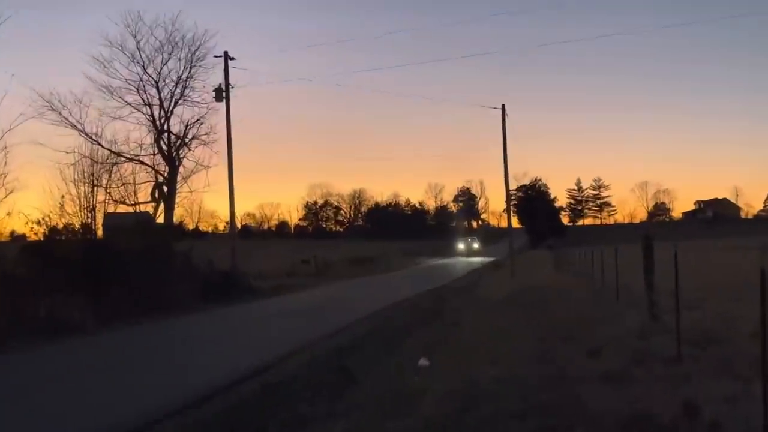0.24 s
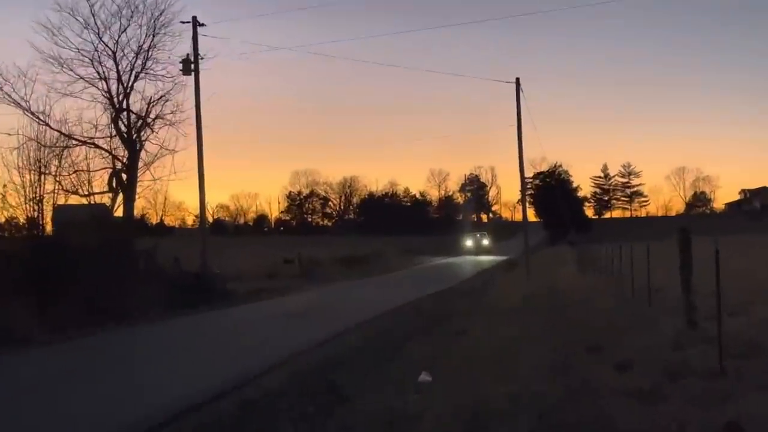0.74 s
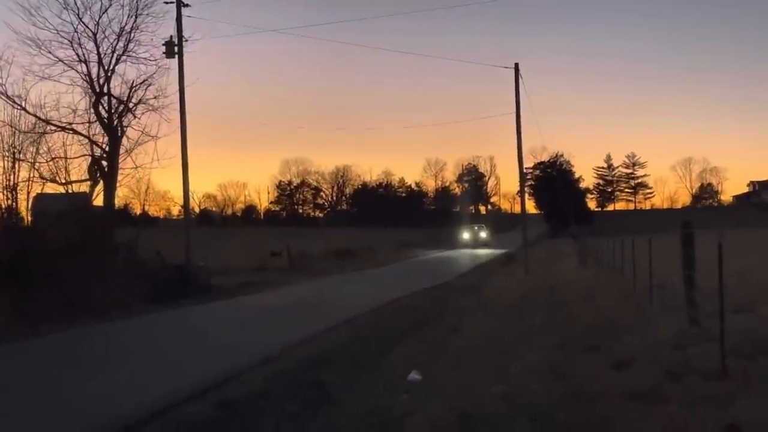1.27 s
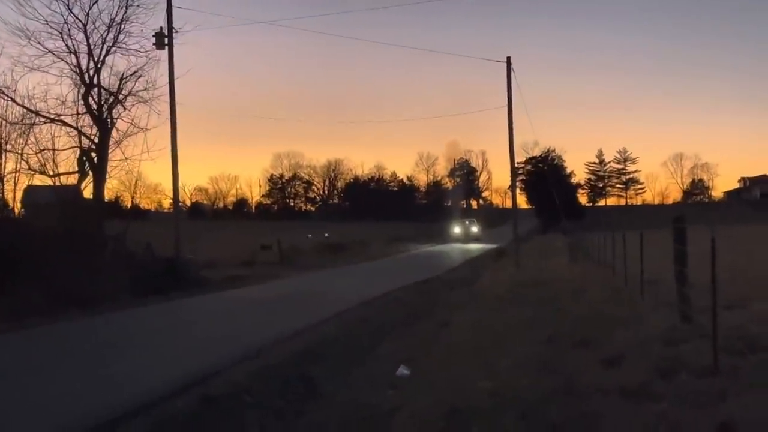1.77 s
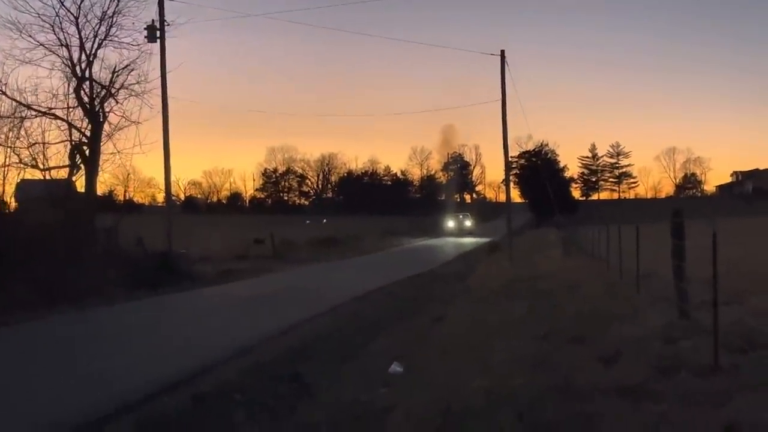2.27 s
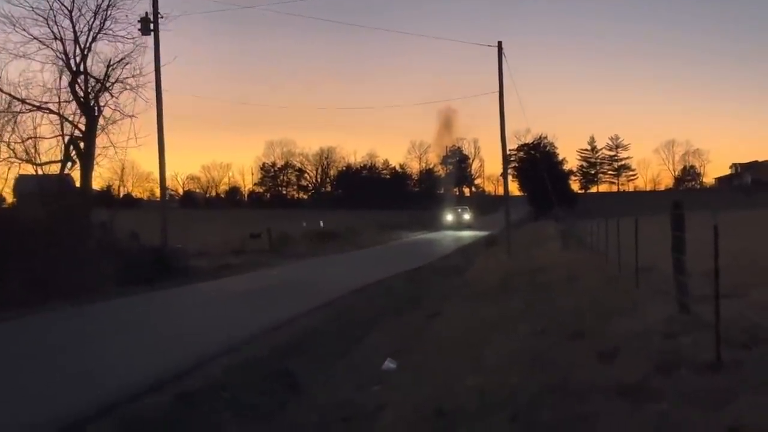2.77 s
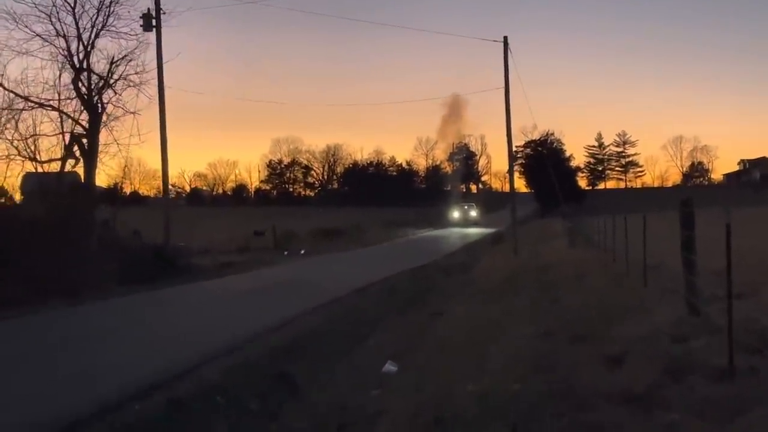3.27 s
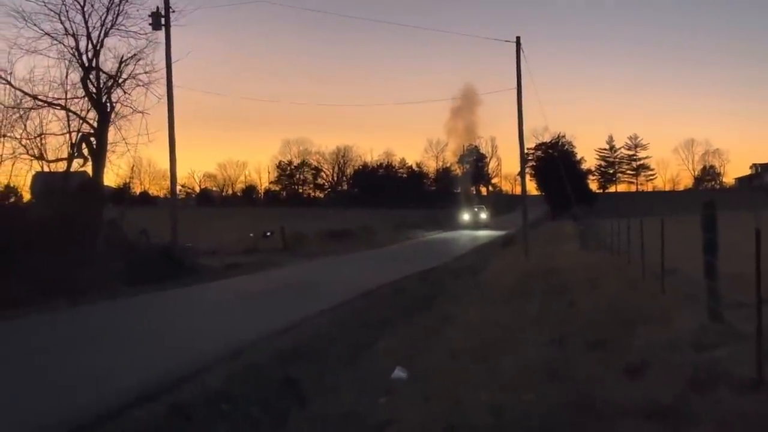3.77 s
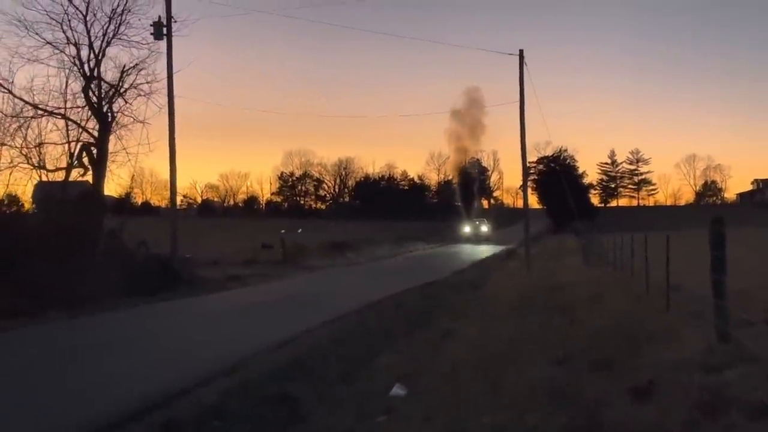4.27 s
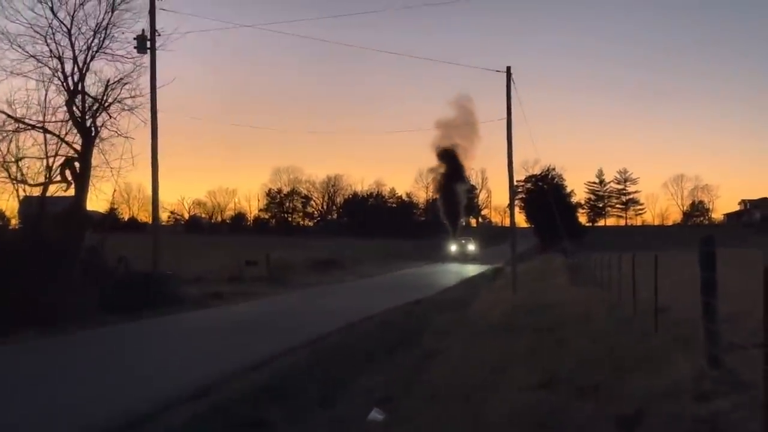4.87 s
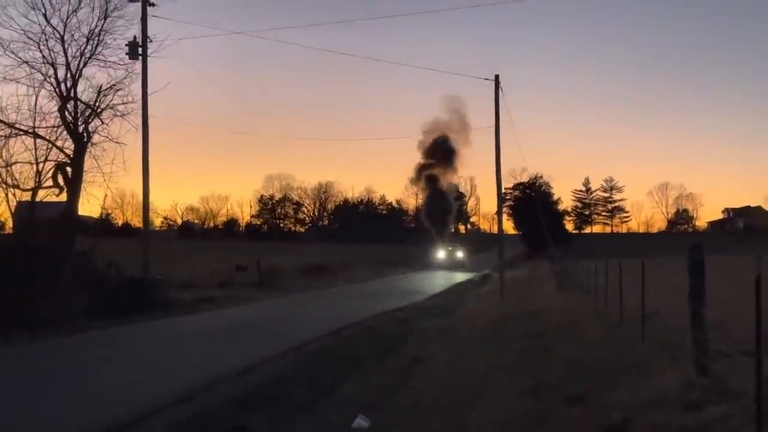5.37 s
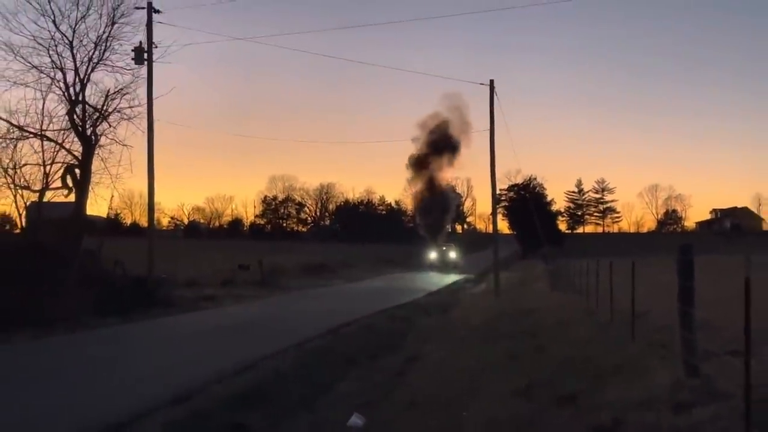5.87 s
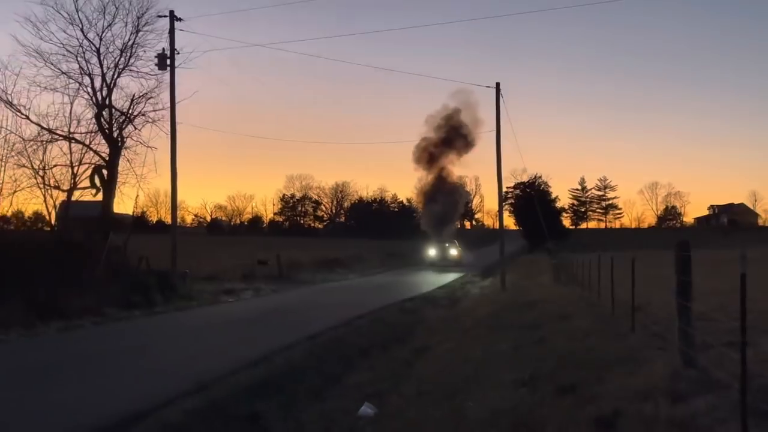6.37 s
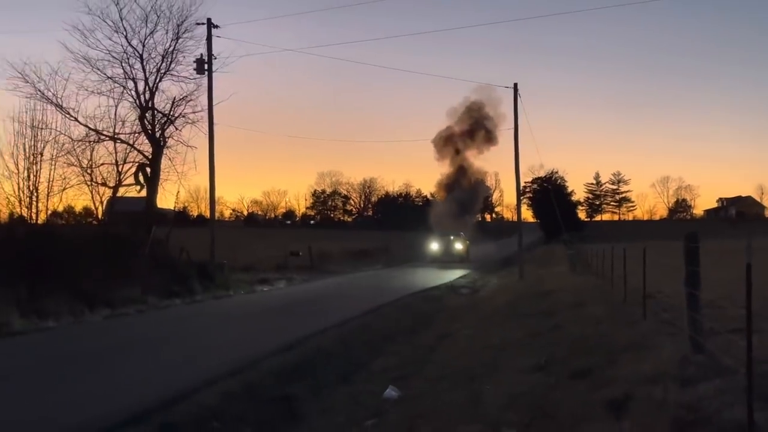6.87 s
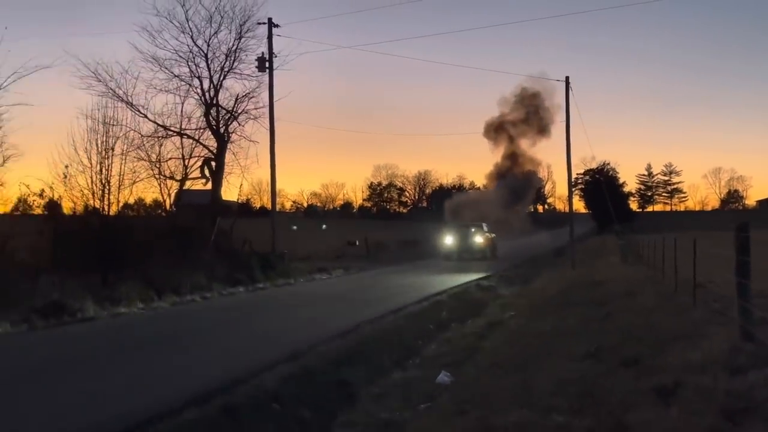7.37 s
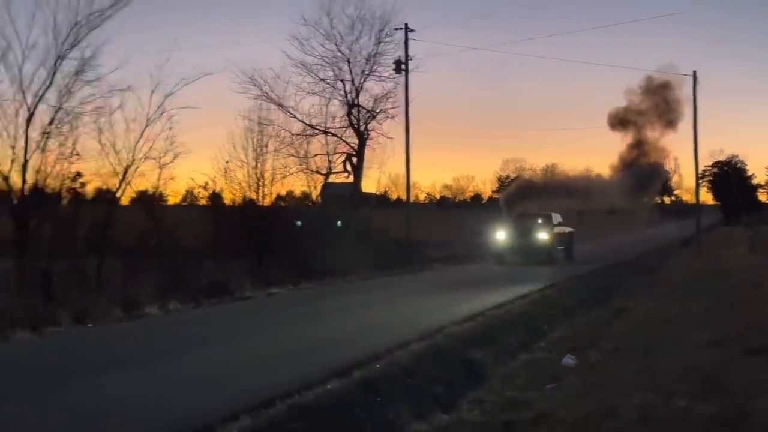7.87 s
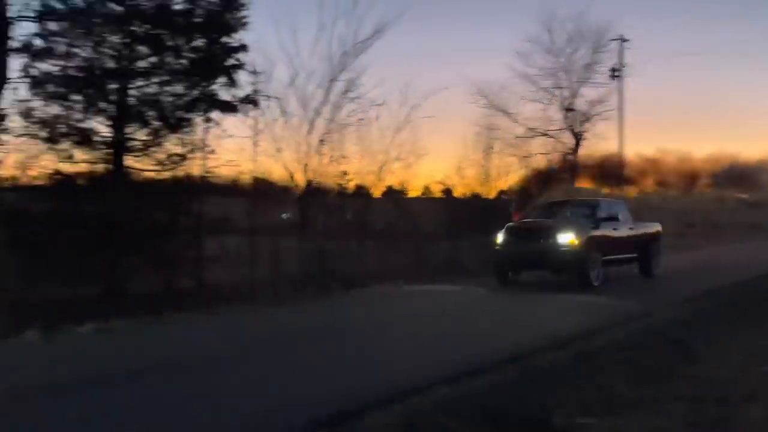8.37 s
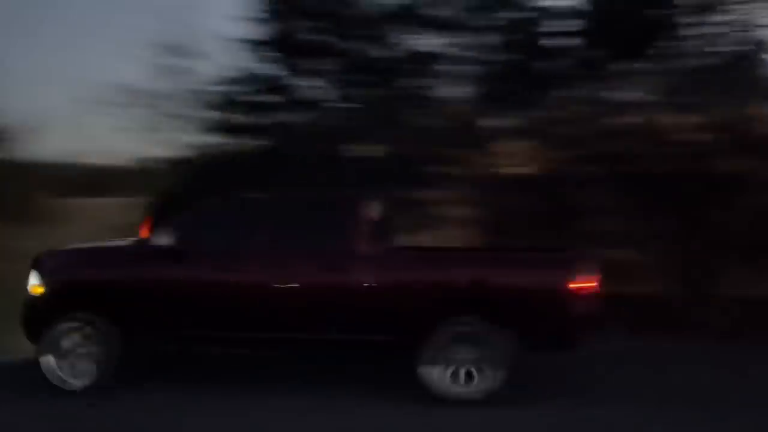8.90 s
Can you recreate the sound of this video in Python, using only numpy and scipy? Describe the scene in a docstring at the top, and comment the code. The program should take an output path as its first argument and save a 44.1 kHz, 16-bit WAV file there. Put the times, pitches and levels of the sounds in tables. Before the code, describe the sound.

On an open rural road, a six-cylinder diesel pickup accelerates towards a handheld stereo microphone at the verge. A booming, barking exhaust note climbs steadily, joined by a thin rising turbo whistle and rougher rasp. After six seconds the pitch drops sharply at a gear change, then climbs again, brighter and hissier. The truck sweeps past with a short tyre and air rush, its note falling away.

```python
"""A six-cylinder diesel pickup pulls hard towards a roadside listener, over a low rumble.
First the exhaust note climbs: each firing gives a boom, a ringing bark and a burst of rasping gas.
From about three seconds a thin turbo whistle rises for a while; the bark grows rougher.
After six seconds the note drops at a gear change and climbs again, with a road echo as the truck nears.
Near the end tyres and air sweep past, and the note falls away as the truck passes."""
import sys
import numpy as np
from scipy import signal
from scipy.fft import rfft, irfft, next_fast_len
from scipy.io import wavfile
from scipy.ndimage import uniform_filter1d, map_coordinates

SR = 44100
rng = np.random.default_rng(int(sys.argv[2]) if len(sys.argv) > 2 else 0)


def voltage_ratio(level):
    """Linear amplitude factor for a level in decibels (scalar or array-like)."""
    return 10 ** (np.asarray(level, float) / 20)


def int16_out(signal):
    """Quantize to a 16-bit WAV file."""
    q = np.round(np.clip(np.atleast_2d(signal).T, -1, 1) * 32767)
    wavfile.write(sys.argv[1], SR, q.astype(np.int16))


N = 403074


def rms_one(x, window_s=0.16):
    """Even out the slow level, so that the sound stays near rms 1."""
    return x / np.sqrt(uniform_filter1d(x ** 2, size=int(window_s * SR), mode="reflect") + 1e-14)


def in_time(rows):
    """Turn the columns of a table into curves, one value a sample."""
    s, *columns = np.transpose(rows)
    return [np.interp(np.arange(N) / SR, s, column) for column in columns]


def cut(x, hz, kind, order=4):
    """Butterworth filter: keeps the low, high or band part of a sound."""
    return signal.sosfilt(signal.butter(order, hz, kind, fs=SR, output="sos"), x)


def resonate(x, modes):
    """Let side-by-side resonances ring, with alternating signs."""
    out = 0
    for k, (hz, width, db) in enumerate(modes):
        r = np.exp(-np.pi * width / SR)
        feedback = [1, -2 * r * np.cos(2 * np.pi * hz / SR), r * r]
        ring = signal.lfilter([(1 - r * r) / 2, 0, (r * r - 1) / 2], feedback, x)
        out = out + (-1) ** k * voltage_ratio(db) * ring
    return out


def coloured(x, table, gain):
    """Filter whose response at each frequency is gain(table value)."""
    hz, value = np.transpose(table)
    size = next_fast_len(N + 2048)
    grid = np.arange(size // 2 + 1) * SR / size
    response = gain(np.interp(np.log(grid + 1), np.log(hz + 1), value))
    return irfft(rfft(x, size) * response, size)[:N]


def drift(rate):
    """Random wander of spread 1; a higher rate [Hz] wanders faster."""
    knots = rng.standard_normal(int(N / SR * 60) + 2)   # 60 a second
    r = np.exp(-2 * np.pi * rate / 60)
    slow = signal.lfilter([1], [1, -r], knots)
    return np.interp(np.arange(N) * 60 / SR, np.arange(len(slow)), slow / slow.std())


# low rumble under the note: (time [s], level [dB])
RUMBLE_LEVEL = [(0.0, -29.5), (2.11, -67), (3.36, -35.5), (6.46, -45), (6.64, -63), (7.41, -47),
                (8.88, -35), (9.14, -64)]


def rumble():
    """Two separate low noises, whose shared level rises and falls."""
    noises = [rms_one(cut(rng.standard_normal(N), [62, 100], "band", order=3), window_s=1.0)
              for _ in range(2)]
    return voltage_ratio(in_time(RUMBLE_LEVEL)[0]) * noises


# tyres and air sweeping past: (time [s], level [dB])
WHOOSH_LEVEL = [(8.45, -102), (8.68, -46), (8.85, -21), (8.93, -34.5), (9.14, -53)]
# resonances of that noise: (frequency [Hz], width [Hz], level [dB])
TYRE_MODES = [(4700, 2000, -3), (5900, 1100, -2.5)]


def whoosh():
    """Smooth noise spread along the passing body, so it differs between the sides."""
    middle, side = [rms_one(cut(resonate(rng.standard_normal(N), TYRE_MODES), 3200, "high"))
                    for _ in range(2)]
    return voltage_ratio(in_time(WHOOSH_LEVEL)[0]) * (middle + 0.55 * side * [[1], [-1]])


# sharp ticks in the treble: (time [s], burst level before ringing [dB])
TICK_TIMES = [(1.612, -27), (1.63, -24), (1.938, -15), (1.948, -23), (1.988, -18), (2.065, -26),
              (3.68, -20)]
# resonances of a tick: (frequency [Hz], width [Hz], level [dB])
TICK_MODES = [(6300, 1500, -10), (8340, 2500, 7.5), (11300, 2100, 0)]


def ticks():
    """Bursts of bright noise that start at once and die away within milliseconds."""
    decay_s = 0.0016
    t = np.arange(N) / SR
    shape = sum(voltage_ratio(db) * (t > s) * np.exp(-np.maximum(t - s, 0) / decay_s) for s, db in TICK_TIMES)
    return cut(resonate(shape * rng.standard_normal(N) + 1e-18, TICK_MODES), 4500, "high")


# turbo whistle: (time [s], pitch before rounding [Hz], level before lift and flicker [dB])
TURBO_WHISTLE = [(2.8, 5500, -56), (3.0, 5750, -50), (3.18, 6000, -46), (3.4, 6320, -49), (3.62, 6700, -39),
                 (3.75, 7030, -45), (3.95, 7620, -47), (4.12, 8250, -41), (4.33, 9150, -41),
                 (4.5, 9900, -47)]


def turbo(waver=0.002):
    """A thin rising whistle that wavers; the wheel's inertia rounds its climb."""
    hz, db = in_time(TURBO_WHISTLE)
    hz = uniform_filter1d(hz, size=SR // 6) * (1 + waver * drift(25.5))
    # eddies smear the line
    blur = .85 + .5 * rms_one(cut(rng.standard_normal(N), 90, "low", order=2), window_s=1.0)
    t = np.arange(N) / SR
    fade_in = np.clip((t - TURBO_WHISTLE[0][0]) / 0.099, 0, 1)
    fade_out = np.clip((TURBO_WHISTLE[-1][0] - t) / .05, 0, 1)
    level = voltage_ratio(db + 2.5 + 1.9 * drift(8.0))
    return np.sqrt(2) * fade_in * fade_out * level * blur * np.sin(2 * np.pi * np.cumsum(hz) / SR)


def beat(turns, depth, lag, sharp, spread_db):
    """Gas flow swells once a firing, each firing with its own strength; lag is in firings."""
    swell = np.exp(sharp * (np.cos(2 * np.pi * (turns - lag)) - 1))
    chance = rng.standard_normal(2400)   # one a firing
    firing = np.floor(turns - lag + 1.5).astype(int)
    return 1 - depth + depth * swell * voltage_ratio(spread_db * chance[firing])


def gas(turns, depth, modes, low_hz, high_hz, lag, sharp, flicker_db, spread_db=2.0):
    """Turbulent noise pulsing with the firings, coloured by resonances, its level flickering."""
    noise = rng.standard_normal(N) * beat(turns, depth, lag, sharp, spread_db)
    coloured_noise = cut(cut(resonate(noise, modes), low_hz, "high"), high_hz, "low", order=2)
    return rms_one(coloured_noise) * voltage_ratio(flicker_db * drift(1.66))


# a narrow high band that sings for a while: (time [s], level [dB])
HIGH_SINGING_LEVEL = [(0, -80), (4.6, -62), (4.85, -36), (5.3, -36.5), (5.6, -42), (7.5, -38), (7.8, -31),
                      (8.5, -34), (8.8, -51), (9.14, -64)]
# its resonance: (frequency [Hz], width [Hz], level [dB])
HIGH_SINGING_MODES = [(6480, 820, 0)]


def high_singing(turns, depth):
    """Gas noise ringing in a narrow band of the high treble, flickering strongly."""
    noise = gas(turns, depth, HIGH_SINGING_MODES, low_hz=5270, high_hz=7600,
                lag=0.21, sharp=1.0, flicker_db=4.0)
    return voltage_ratio(in_time(HIGH_SINGING_LEVEL)[0]) * noise


# a band a little lower that sings for a while: (time [s], level [dB])
MID_SINGING_LEVEL = [(0, -50), (2.5, -49), (3.2, -45.5), (4.3, -37), (4.8, -40), (5.8, -41), (6.15, -30),
                     (6.45, -36), (6.55, -48), (7.5, -40), (9.14, -60)]
# its resonance: (frequency [Hz], width [Hz], level [dB])
MID_SINGING_MODES = [(4950, 1150, 0)]


def mid_singing(turns, depth):
    """Gas noise ringing in a band of the lower treble."""
    noise = gas(turns, depth, MID_SINGING_MODES, low_hz=4230, high_hz=6300,
                lag=0.17, sharp=0.53, flicker_db=1.5)
    return voltage_ratio(in_time(MID_SINGING_LEVEL)[0]) * noise


# a very narrow low band that sings briefly: (time [s], level [dB])
LOW_SINGING_LEVEL = [(4.6, -70), (4.75, -29), (4.98, -26.5), (5.1, -72)]
# its resonance: (frequency [Hz], width [Hz], level [dB])
LOW_SINGING_MODES = [(1230, 50, 0)]


def low_singing(turns, depth):
    """Gas noise ringing almost like a tone."""
    noise = gas(turns, depth, LOW_SINGING_MODES, low_hz=1000, high_hz=1500,
                lag=0, sharp=.7, flicker_db=0.0)
    return voltage_ratio(in_time(LOW_SINGING_LEVEL)[0]) * noise


# resonances of the hiss: (frequency [Hz], width [Hz], level [dB])
HISS_MODES = [(4400, 2500, 3), (6730, 530, 5), (8700, 2230, 4), (11100, 1550, -10)]


def hiss(turns, depth):
    """The highest, widest layer of gas noise."""
    return gas(turns, depth, HISS_MODES, low_hz=4300, high_hz=15300,
               lag=0.27, sharp=0.73, flicker_db=0.84)


# resonances of the sizzle: (frequency [Hz], width [Hz], level [dB])
SIZZLE_MODES = [(3150, 480, 2), (3760, 830, 1.5), (4333, 890, -3)]


def sizzle(turns, depth, rough):
    """Gas noise below the hiss; firings grow more unequal with turbulence."""
    return gas(turns, depth, SIZZLE_MODES, low_hz=2450, high_hz=5840,
               lag=0.08, sharp=1.6, flicker_db=.8, spread_db=1.2 + 3.5 * rough)


# resonances of the rasp: (frequency [Hz], width [Hz], level [dB])
RASP_MODES = [(2360, 535, 4.5), (1923, 470, 5.5), (2760, 400, 0)]


def rasp(turns, depth):
    """Gas noise in the upper middle, the harsh edge of each firing."""
    return gas(turns, depth, RASP_MODES, low_hz=1580, high_hz=3160,
               lag=0.046, sharp=0.7, flicker_db=0.94)


# resonance of the roar: (frequency [Hz], width [Hz], level [dB])
ROAR_MODES = [(1220, 1300, 0)]


def roar(turns, depth):
    """The deepest broad layer of gas noise."""
    return gas(turns, depth, ROAR_MODES, low_hz=937, high_hz=1920,
               lag=0.012, sharp=0.78, flicker_db=1.17)


# short puffs of brighter gas: (time [s], lift of the hiss [dB])
PUFF_LIFTS = [(0.82, 5.5), (1.40, 3), (1.64, 6), (1.94, 6), (2.04, 5), (2.52, 1), (2.76, 5.5), (3.12, 5.5),
              (3.6, 4.5), (7.74, 4.5), (8.16, 1.5)]


def puffs():
    """Bell-shaped lifts in dB."""
    half_width_s = 0.033
    t = np.arange(N) / SR
    return sum(db * np.exp(-((t - s) / half_width_s) ** 2) for s, db in PUFF_LIFTS)


# the gas leaving the stack, before the puffs:
# (time [s], bark level [dB], roar level [dB], rasp level [dB], sizzle level [dB], hiss level [dB])
GAS_LEVELS = [(0.0, -26, -34, -33.5, -30.5, -46.5), (0.86, -22.5, -31.5, -29, -33, -42),
              (1.3, -23.5, -34, -29, -32, -43), (1.93, -20.5, -29.5, -27.5, -32, -37),
              (2.19, -25.5, -37, -30.5, -35, -41.5), (2.74, -23, -29.5, -27.5, -30.5, -36.5),
              (2.9, -24, -30, -30.5, -33, -40.5), (3.13, -25, -31, -26, -29, -36),
              (3.42, -26.5, -33, -31, -35, -35), (3.64, -24, -28, -26, -29.5, -35.5),
              (4.45, -22, -19.5, -18.5, -27.5, -33), (4.7, -26.5, -23, -18, -26, -33.5),
              (4.85, -27, -26, -20.5, -21, -35), (5.16, -28, -25, -19.5, -21, -36),
              (5.62, -31.5, -29.5, -24.5, -28.5, -34), (6.25, -31, -30.5, -25, -26.5, -33),
              (6.45, -32.5, -30, -27.5, -27.5, -34), (6.6, -32, -28.5, -33, -32.5, -37),
              (6.92, -30.5, -27, -25, -22, -26), (7.55, -31, -23, -26.5, -23, -25),
              (7.9, -31.5, -27, -31, -22.5, -22.5), (8.15, -30.5, -25.5, -37, -22.5, -23),
              (8.4, -28, -26, -29.5, -22, -20.5), (8.6, -27, -25.5, -28, -21, -18.5),
              (8.72, -24, -26.5, -33, -26, -21), (8.88, -29.5, -29.5, -30.5, -34, -23.5),
              (8.97, -30, -32, -48, -42.5, -38), (9.14, -38, -37.5, -47, -47, -42)]


def gas_levels():
    """Layer levels in dB; a puff lifts the hiss most, the sizzle by half and the rasp a little."""
    shares = [0, 0, 0.14, 0.47, 1]
    return in_time(GAS_LEVELS) + np.outer(shares, puffs())


# how the gas flows: (time [s], turbulent share of the bark [0-1],
# depth of the beat in the gas [0-1], unevenness of the cylinders [0-1])
ENGINE_LOAD = [(0, .06, .9, .95), (1, .05, .92, .72), (1.8, .06, .9, .55), (2.2, .09, .85, .5),
               (2.9, .2, .8, .6), (3.7, .55, .6, .75), (4.6, .65, .75, .7), (5.5, .52, .75, .7),
               (6.3, .52, .7, .6), (6.6, .8, .5, .4), (7.5, .75, .65, .5), (8.2, .85, .65, .4),
               (9.14, .97, .4, .3)]


def engine_load():
    """Curves of turbulence, beat depth and unevenness."""
    return in_time(ENGINE_LOAD)


# in firing order, at full unevenness: (strength before turbulence evens it [dB], lag in the manifold [ms])
CYLINDERS = [(-3.5, .35), (-1, -.05), (2, -.27), (-5.5, .22), (-1, -.07), (2, -.27)]
# resonances of the pipe: (frequency [Hz], width [Hz], level [dB])
PIPE_MODES = [(378, 158, 1), (671, 175, 5.5), (871, 248, 3), (1175, 270, -5)]


def bark(turns, per_s, rough, depth, uneven, lead=0.321, scatter_db=.8, soft_hz=1200):
    """A rounded pressure pulse per firing rings the pipe; uneven timing adds lines between harmonics."""
    phase = turns + lead
    at = np.flatnonzero(np.diff(np.floor(phase))) + 1   # samples where a firing starts
    strength_db, lag_ms = np.resize(CYLINDERS, (len(at), 2)).T
    evening = np.clip(1.1 - 2 * rough[at], 0, 1)
    chance_db = scatter_db * rng.standard_normal(2400)[:len(at)]
    strength = voltage_ratio(strength_db * uneven[at] ** 2 * evening + chance_db)
    shift = (lag_ms - lag_ms.mean()) * SR / 1000
    pulses = np.zeros(N)
    places = at + np.round(shift * uneven[at]).astype(int)
    pulses[np.clip(places, 0, N - 1)] = strength / strength.mean()

    for k in range(1, 6):   # take out the harmonics that belong to the boom
        angle = 2 * np.pi * k * np.outer((per_s * uneven)[::400], shift[:len(CYLINDERS)]) / SR
        kept = np.repeat(np.mean(np.cos(angle), axis=1), 400)[:N]   # what uneven timing leaves of each
        pulses -= 2 * per_s / SR * kept * np.cos(2 * np.pi * k * phase)
    pulses = -cut(cut(resonate(pulses, PIPE_MODES), soft_hz, "low"), 265, "high", order=2)
    echo_ms, echo_share = 4.316, 0.17
    pulses = pulses + echo_share * np.roll(pulses, round(echo_ms * SR / 1000))   # sent back by the pipe's end

    flow = beat(phase, depth, lag=0.11, sharp=0.4, spread_db=0.0)
    eddies = resonate(rng.standard_normal(N) * flow, PIPE_MODES)
    eddies = cut(cut(eddies, soft_hz, "low"), 363, "high", order=4)
    mix = np.sqrt(1 - rough) * rms_one(pulses) + np.sqrt(rough) * rms_one(eddies)
    upper = cut(mix, [720, 1250], "band")
    return mix * rms_one(upper) / (upper + 1e-12)   # hold the upper band at rms 1


# what the exhaust lets out of an overtone, by its pitch: (frequency [Hz], level [dB])
OUTLET_LEVEL = [(180, -27.5), (285, -38.5), (330, -34), (390, -29), (465, -27.5), (550, -29.5), (680, -29),
                (900, -29), (1150, -33)]
# one column, second to fifth harmonic: (own lift [dB])
OVERTONE_LIFTS = [2, -0.5, -3, -5]
# extra lift of the fourth and fifth harmonic: (time [s], lift [dB])
UPPER_LIFT = [(0, 2), (2.5, -2), (3.3, -1), (4.0, -16), (4.6, 0.5), (5.2, 0), (6.2, 0), (7.0, -2),
              (7.5, -4), (8.2, -3.5), (9.14, -10)]


def overtones(per_s, lift_db, rough):
    """Each overtone takes the outlet's level at its pitch of the moment, and wavers."""
    waver_db, flutter_db = 0.5, .9   # flutter grows with turbulence and the harmonic's number
    hz, outlet_db = np.transpose(OUTLET_LEVEL)
    levels_db = []
    for k, own_db in zip(range(2, 6), OVERTONE_LIFTS):
        level_db = own_db + lift_db + np.interp(np.log(k * per_s), np.log(hz), outlet_db)
        level_db = level_db + (k > 3) * in_time(UPPER_LIFT)[0]
        level_db = level_db + waver_db * drift(1.0) + (k - 1) * flutter_db * rough * drift(26.0)
        levels_db.append(level_db)
    return levels_db


# how the tones fall behind the bark as the note climbs through the pipe's low resonances:
# (firing rate [1/s], lag of the boom [cycles], lag added to each overtone [its own cycles])
TONE_LAG = [(90, -.07, -.45), (98, .05, -.45), (107, .2, -.33), (119, .37, -.22), (128, .52, -.03),
            (137, .64, 0), (160, .68, -.37), (188, .88, -.2), (205, .95, -.08), (230, .95, -.08)]


def tone_lags(per_s):
    """Smoothed lags of boom and overtones at the firing rate of the moment."""
    rates, *lags = np.transpose(TONE_LAG)
    return [uniform_filter1d(np.interp(per_s, rates, lag), size=SR // 4) for lag in lags]


# one column, by rising pitch: (undertone level against their common level [dB])
UNDERTONE_LEVELS = [-32, -23, -11, 1, -3.5, -12, -4, -12, -12.5, -20]
# one column, in the same order: (undertone pitch [sixths of the firing rate])
UNDERTONE_PITCHES = [1, 2, 3, 4, 5, 7, 8, 9, 10, 11]


def boom(turns, levels_db, under_db, lag, leads=(.35, .4, .4, .45)):
    """The lowest harmonics of the firing rate are clean tones; unequal cylinders add faint undertones."""
    tones = 0
    all_lags = (lag[0], *np.add.outer(leads, lag[1]))
    for k, (db, behind) in enumerate(zip(levels_db, all_lags), start=1):
        tones = tones + voltage_ratio(db) * np.cos(2 * np.pi * (k * turns - behind))
    for sixths, db in zip(UNDERTONE_PITCHES, UNDERTONE_LEVELS):
        cycles = sixths * turns / len(CYLINDERS) + rng.random()
        tones = tones + voltage_ratio(under_db + db + 4.1 * drift(18.0)) * np.cos(2 * np.pi * cycles)
    return np.sqrt(2) * tones


# the exhaust note: (time [s], firings as heard [1/s], boom level before waver [dB], overtone lift [dB])
EXHAUST_NOTE = [(0.0, 89, -13, 0.5), (0.38, 96.5, -11.5, -1), (0.84, 103, -12, -2), (1.63, 115.8, -11.5, 0),
                (1.93, 125.6, -10, 4.5), (2.24, 118, -12.5, 0), (2.42, 119.6, -13, 2),
                (2.63, 120, -12, 2.5), (2.77, 125.6, -10, 4), (3.2, 135, -8.5, 5.5),
                (3.45, 138.5, -10.5, 2), (3.64, 144.5, -8, 7.5), (4.15, 165.4, -10, 7.5),
                (4.5, 187.5, -16, 4.5), (4.66, 194, -16.5, 5), (4.84, 193, -16, 5), (4.98, 201, -22.5, 3.5),
                (5.4, 217, -24, -1.5), (5.88, 220, -25, -1.5), (6.21, 225, -22, -0.5), (6.36, 211, -22, 0),
                (6.41, 200, -20, -1), (6.54, 151, -18, -2.5), (6.59, 142, -17, 0), (6.77, 152, -16.5, -2),
                (7.09, 168, -14.5, -3), (7.4, 184, -15, 0.5), (7.66, 198, -19, -1), (8.35, 227, -20.5, 3),
                (8.55, 230, -27, 5), (8.7, 226, -17.5, 3), (8.86, 215, -16, 2), (8.96, 204, -27.5, -6),
                (8.99, 195, -31, -0.5), (9.14, 117, -29, 2.5)]


def exhaust_note():
    """Firing rate, boom level and overtone lift, and the count of firings so far."""
    per_s, boom_db, lift_db = in_time(EXHAUST_NOTE)
    turns = np.cumsum(uniform_filter1d(per_s, size=SR // 25)) / SR   # the flywheel rounds changes of speed
    return per_s, boom_db, lift_db, turns


# road echo as the truck nears: (time [s], lag [ms], strength [0-1])
ROAD_ECHO = [(0, .6, 0), (7.3, .64, .1), (7.55, .69, .25), (7.75, .78, .4), (8.1, 1.04, .75),
             (8.35, 1.25, .7), (8.6, 1.5, .65), (8.85, 1.62, .5), (9.14, 1.8, .2)]
# what the road reflects: (frequency [Hz], level [dB])
GROUND_REFLECTION = [(500, -8), (1400, 0), (2200, -3), (4500, -4), (7000, -20)]


def road_echo(x):
    """The ground returns a dull, inverted copy a little later; notches slide down as the truck nears."""
    lag_ms, strength = in_time(ROAD_ECHO)
    dull = coloured(x, GROUND_REFLECTION, voltage_ratio)
    late = map_coordinates(dull, [np.arange(N) - lag_ms * SR / 1000], order=3, mode="nearest")
    return x - strength * late


# the part that differs between left and right: (frequency [Hz], level [dB])
SCATTER_COLOUR = [(100, -65), (400, -19), (1000, -20), (2200, -5), (3500, 1), (6000, -8), (12000, -3.5)]


def scattered(truck):
    """Three late copies of the truck, added and coloured."""
    copies = sum(np.roll(truck, round(ms * SR / 1000)) * share
                 for ms, share in [(7.3, -0.18), (13.1, -0.42), (22.7, 0.55)])
    return coloured(copies, SCATTER_COLOUR, voltage_ratio)


# sudden dips of the whole sound: (time [s], depth [dB])
LEVEL_DROPS = [(4.257, 1), (4.452, 1.5), (4.63, 3), (4.872, 2.5), (5.375, 0.5), (7.766, 2.5), (8.206, 2.5),
               (8.426, 3.5), (8.612, 3.5)]


def drops():
    """Gain that falls within milliseconds and recovers slowly."""
    climb_s = 0.17
    t = np.arange(N) / SR
    loss_db = sum(db * (t > s) * np.exp(-np.maximum(t - s, 0) / climb_s) for s, db in LEVEL_DROPS)
    return voltage_ratio(-uniform_filter1d(loss_db, size=200))


# place between the ears: (time [s], bass left over right [dB], stack left over right [dB],
# gain of the scattered sound [dB])
STEREO_PLACE = [(0.0, 1.0, -2.5, 5), (0.3, 0.5, -2, -7), (1.75, 1, -0.5, -6.5), (5.85, 0.5, 0, -7),
                (7.54, 1.0, -1.5, -0.5), (8.35, 2, -7, -4), (8.88, 2, -0.5, 14.5), (9.14, 1.0, 3, 11)]


def scene():
    """Truck and rumble, panned, with a little scattered sound that differs between the sides."""
    per_s, boom_db, lift_db, turns = exhaust_note()
    rough, depth, uneven = engine_load()
    bark_db, roar_db, rasp_db, sizzle_db, hiss_db = gas_levels()
    tones_db = [boom_db + 0.86 * drift(5.0), *overtones(per_s, lift_db, rough)]
    under_db = -30.5 + 0.52 * boom_db   # undertones follow about half of the boom's dB
    low_noise = rumble()
    bass = boom(turns, tones_db, under_db, tone_lags(per_s)) + low_noise[0]

    stack = voltage_ratio(bark_db) * bark(turns, per_s, rough, depth, uneven)
    stack += voltage_ratio(roar_db) * roar(turns, depth)
    stack += voltage_ratio(rasp_db) * rasp(turns, depth)
    stack += voltage_ratio(sizzle_db) * sizzle(turns, depth, rough)
    stack += low_singing(turns, depth)
    stack = road_echo(stack)

    treble = voltage_ratio(hiss_db) * hiss(turns, depth) + turbo() + ticks()
    treble += high_singing(turns, depth) + mid_singing(turns, depth)

    *pans_db, scatter_db = in_time(STEREO_PLACE)
    bass_pan, stack_pan = (voltage_ratio(np.outer([.5, -.5], pan_db)) for pan_db in pans_db)
    unlike = voltage_ratio(scatter_db) * scattered(bass + stack + treble) + voltage_ratio(-26) * low_noise[1]
    sides = bass * bass_pan + stack * stack_pan + treble + whoosh() + unlike * [[.5], [-.5]]
    return drops() * sides


# the microphone's two close ports: (frequency [Hz], lead of the left over the right [radians])
PORT_LEAD = [(0, 0), (1640, -0.1), (2760, 0.1), (3010, 0.7), (4220, 0.3), (4740, 0.6), (5600, 0.0),
             (7320, 0.0), (7750, 0.2), (8790, -0.1), (9730, -2.6), (10900, -4.0), (11500, -6.2),
             (12400, -6.3)]


def two_ports(sides):
    """Each port takes half of the phase difference, the left ahead and the right behind."""
    left = coloured(sides[0], PORT_LEAD, lambda lead: np.exp(.5j * lead))
    right = coloured(sides[1], PORT_LEAD, lambda lead: np.exp(-.5j * lead))
    return np.array([left, right])


def roll_off(x):
    """The treble ends steeply here."""
    return signal.sosfilt(signal.butter(12, 12860, fs=SR, output="sos"), x)


def record(dry):
    """The microphone dulls the very top, its ports fall out of step in the treble; peaks are rounded."""
    dull = cut(dry, 10420, "low", order=4)
    top = 1.35   # the rounded peaks stay below this
    mix = top * np.tanh(two_ports(dull) / top)
    return roll_off(mix)


dry = scene()
out = record(dry)
int16_out(out)
```